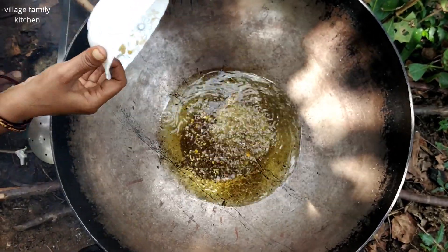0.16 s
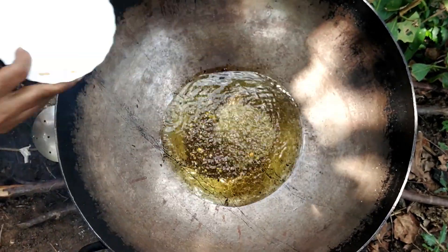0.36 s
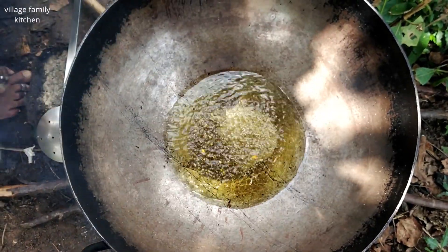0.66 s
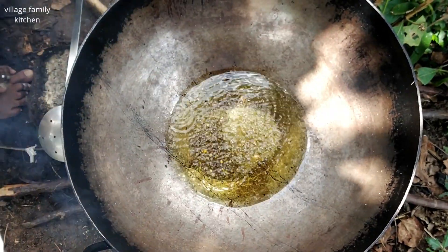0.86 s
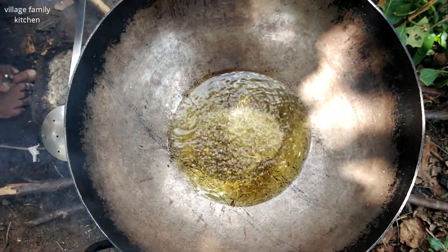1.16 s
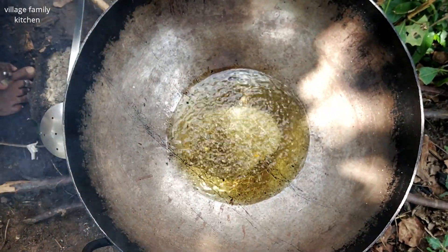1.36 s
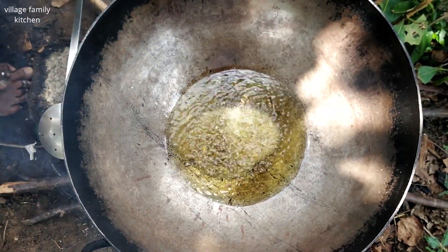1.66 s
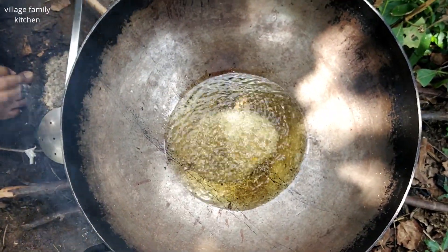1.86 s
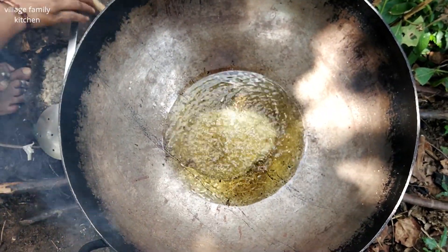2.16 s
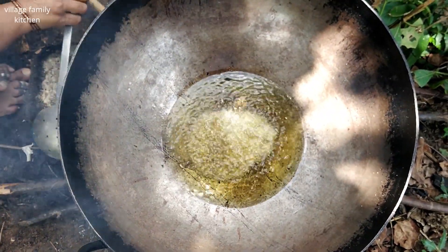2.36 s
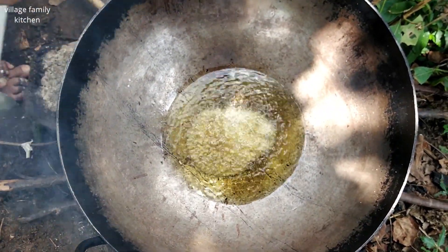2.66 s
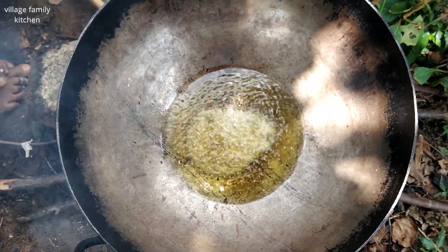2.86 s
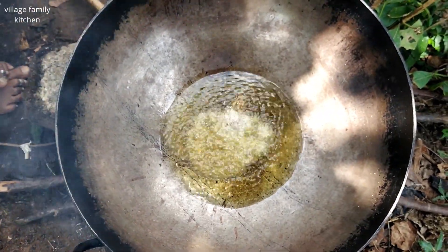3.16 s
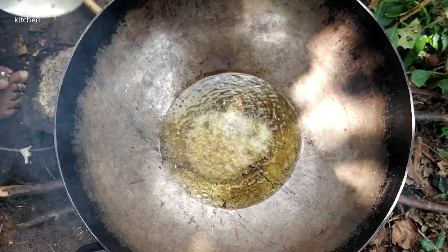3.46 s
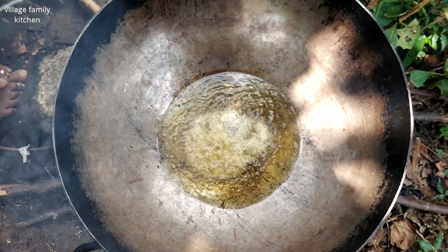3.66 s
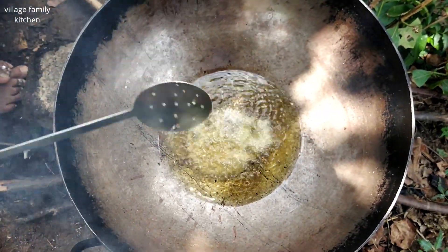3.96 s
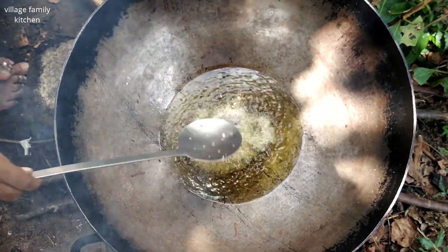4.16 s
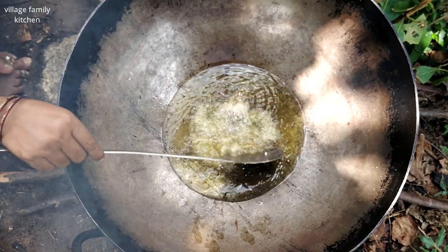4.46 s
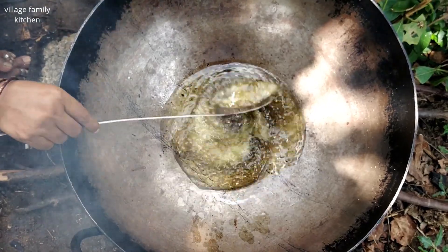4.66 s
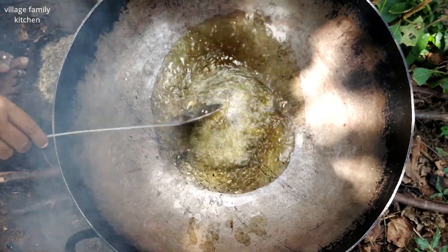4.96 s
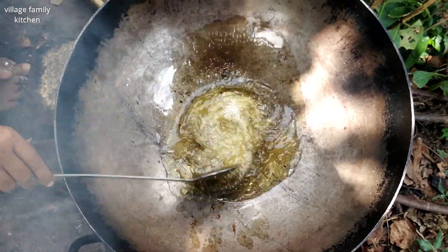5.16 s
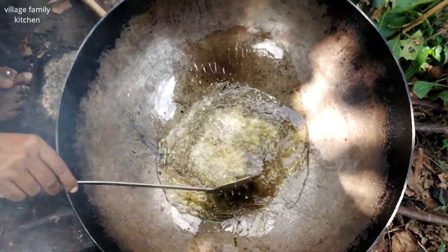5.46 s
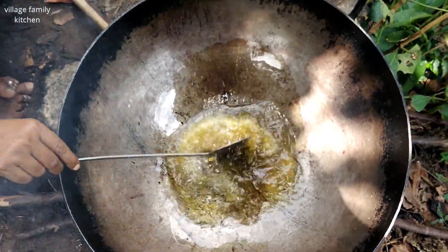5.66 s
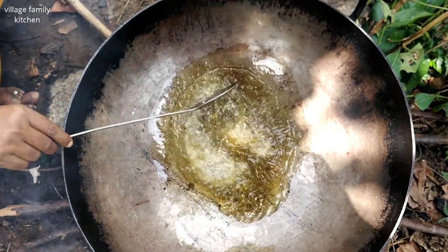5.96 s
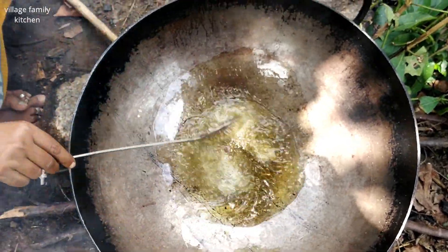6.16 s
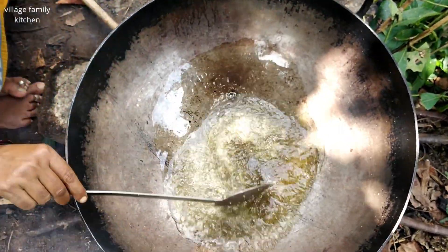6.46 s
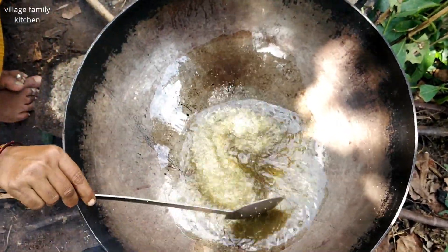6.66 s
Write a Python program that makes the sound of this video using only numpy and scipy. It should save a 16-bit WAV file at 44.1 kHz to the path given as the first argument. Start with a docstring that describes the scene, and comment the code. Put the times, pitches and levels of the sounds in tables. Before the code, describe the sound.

Heard close up outdoors, damp seeds in hot oil burst into dense hissing, spitting and very sharp snaps for about a second. The frying thins to a soft fizz with separate bubbly, ringing pops. A steel skimmer clinks as it is picked up, then knocks and scrapes the iron wok with short gritty strokes while crackling continues. A low wood fire murmurs underneath.

```python
"""Seeds fry in a pool of hot oil in an iron wok over a wood fire, outdoors and heard close up.
The oil is fizz made of countless tiny bursts, with showers of bright spitting that thin as the seeds dry.
Steam bubbles pop as short rising rings with noisy tails; seeds snap as millisecond noise bursts.
The fire murmurs as shaped noise and cracks; a steel skimmer clinks in its modes, then knocks and scrapes.
Something hoots faintly far away, and a limiter ducks on the sharpest peaks."""
import sys
import numpy as np
from scipy import signal
from scipy.fft import rfft, irfft, next_fast_len
from scipy.io import wavfile
from scipy.ndimage import uniform_filter1d, map_coordinates

SR = 44100
rng = np.random.default_rng(int(sys.argv[2]) if len(sys.argv) > 2 else 0)


def to_wav(sig):
    """Store sig (one row per channel, or 1-D mono) as 16-bit WAV at the path in sys.argv[1].

    Samples outside -1..1 are clipped; the rate is SR.
    """
    pcm = np.clip(np.atleast_2d(sig), -1, 1) * 32767
    pcm = np.round(pcm).astype(np.int16)
    wavfile.write(sys.argv[1], SR, pcm.T)  # frames by channels


N = 300321

# Ringing modes of the iron wok. Each row: pitch in Hz, width in Hz, relative level in dB.
WOK_MODES = [(211.4, 26, 3), (335, 50, 4.5), (520, 26, -3), (894, 67, -4.5), (1294, 66, 0),
             (1650, 100, 3.5), (1984, 120, 7.5), (2167, 170, 6.5), (2390, 78, 6.5), (2874, 195, 14.5),
             (2943, 146, 15), (3240, 9.3, 12.5), (3400, 59, 9), (3740, 60, 9.5), (4050, 62, -12),
             (4920, 69, 6), (5720, 68, 6), (6400, 11, 8.5), (7600, 110, -17)]


def amp(db):
    """Decibels to gain."""
    return 10 ** (np.asarray(db) / 20)


def unit(x):
    """Scale to rms 1."""
    return x / np.sqrt(np.mean(x ** 2) + 1e-20)


def along(points, hz):
    """Read a curve of (Hz, value) points on a log frequency axis."""
    f, value = np.transpose(points)
    return np.interp(np.log(hz + 1), np.log(f + 1), value)


def curve(rows):
    """Draw straight lines through (seconds, value) rows, one value per sample."""
    return np.interp(np.arange(N) / SR, *np.transpose(rows))


def wobble(rate):
    """A smooth random curve with rate knots a second."""
    knots = rng.standard_normal(int(N * rate / SR) + 4)
    return map_coordinates(knots, [np.arange(N) * rate / SR])


def chance_times(per_s):
    """Random moments in seconds, one in each slot of 1 / per_s seconds."""
    slots = np.arange(int(per_s * N / SR))
    return (slots + rng.random(len(slots))) / per_s


def add(out, s, x):
    """Mix x into out at s seconds."""
    i = max(round(s * SR), 0)
    out[:, i:i + x.shape[-1]] += x[..., :max(N - i, 0)]


def filtered(x, response):
    """Shape x by a response given as a function of frequency in Hz."""
    n = x.shape[-1]
    padded = next_fast_len(n + n // 10)
    spectrum = rfft(x, padded) * response(np.fft.rfftfreq(padded, 1 / SR))
    return irfft(spectrum, padded)[..., :n]


def resonance(f, hz, width):
    """A causal resonance of peak gain 1."""
    return 1j * f * width / (hz * hz - f * f + 1j * f * width)


def low_cut(x, hz):
    """A causal high-pass, 12 dB an octave."""
    return filtered(x, lambda f: 1j * f / hz * resonance(f, hz, hz))


def band_noise(hz, width, size):
    """A band of noise around one pitch, on two channels."""
    return unit(filtered(rng.standard_normal((2, size)), lambda f: resonance(f, hz, width) ** 2))


def spread(pair):
    """Two unrelated signals become left and right, more alike in the bass than in the treble."""
    # Stereo likeness. Each row: frequency in Hz, left-right correlation.
    likeness = [(50, 0.7), (200, 0.91), (1000, 0.57), (3000, 0.22), (8000, 0.067)]

    def mid_side_gains(f):
        turn = np.arccos(np.clip(along(likeness, f), -1, 1)) / 2
        return np.array([np.cos(turn), np.sin(turn)])

    mid, side = filtered(pair, mid_side_gains)
    return np.array([mid + side, mid - side])


def grains(rate, size_db):
    """Random impulses of either sign on two channels, rate a second, their sizes scattered."""
    size = amp(size_db * np.minimum(rng.exponential(size=(2, N)), 4))
    hits = rng.random((2, N)) < rate / SR
    return hits * size * rng.choice([-1, 1], (2, N))


def patchy(x, depth_db):
    """Each band swells and sinks on its own, over tens of milliseconds."""
    bins = signal.stft(x, nperseg=512)[2]
    field = rng.standard_normal(bins.shape[1:])
    field = uniform_filter1d(field, size=7, axis=0)  # across frequency
    field = uniform_filter1d(field, size=6, axis=1)  # across time
    return signal.istft(bins * amp(depth_db * unit(field)), nperseg=512)[1][:, :N]


def sizzle(fizz_db=-1.5, crackle_db=-7, bubble_db=-5):
    """Countless tiny bursts merge into fizz; fewer, larger ones crackle or ring briefly, each at its own pitch."""
    # Frying strength, fierce on the damp seeds and livelier again when stirred.
    # Each row: time in seconds, level in dB.
    frying = [(0, -26.5), (0.3, -23), (0.76, -31), (1.35, -37), (2.5, -34.5), (4.2, -34), (4.55, -31),
              (5.15, -34), (5.4, -32), (6.81, -34)]
    # Tone of the fizz. Each row: frequency in Hz, gain in dB.
    fizz_tone = [(300, -2), (900, -4.5), (2000, 1), (3100, 8), (4500, 4.5), (7000, 3.5), (8500, 1.5),
                 (10800, 3), (13000, -7), (16000, -12)]
    fizz = patchy(spread(grains(rate=14000, size_db=2)), depth_db=3.3)
    fizz = unit(filtered(fizz, lambda f: amp(along(fizz_tone, f))))
    fizz = fizz * amp(3.92 * wobble(31))
    t = np.arange(SR // 30) / SR
    crackle, bubbles = np.zeros((2, 2, N))
    # lowest pitch in Hz, highest over lowest, bandwidth over pitch, t60 in seconds
    for layer, lowest_hz, span, breadth, t60 in [(crackle, 4500, 2.6, .4, .008), (bubbles, 3000, 4, .13, .06)]:
        for when, pitch, size, pan in rng.random((260, 4)):
            hz = lowest_hz * span ** pitch
            burst = band_noise(hz, breadth * hz, size=len(t))
            burst = burst * amp(20 * size ** 2 - 60 * t / t60)
            add(layer, when * N / SR, burst * np.sqrt([[pan], [1 - pan]]))
    mix = amp(fizz_db) * fizz + amp(crackle_db) * unit(crackle) + amp(bubble_db) * unit(bubbles)
    return amp(curve(frying)) * mix


def spitting(centre_hz=10500, width_hz=8000, t60=0.011):
    """A dense shower of bright little snaps swells as the damp seeds heat and thins as they dry."""
    peak_s, peak_db = 0.36, -22.5  # hardest once the seeds have heated through
    heating_db_per_s, drying_db_per_s, dry_db = 27, 17.5, -45.5  # dry_db is what dry seeds keep up
    out, t = np.zeros((2, N)), np.arange(SR // 100) / SR
    for when, size, colour in rng.random((1500, 3)):
        hz = centre_hz * (0.33 + 0.79 * colour)
        burst = band_noise(hz, width_hz, size=len(t)) * amp(-60 * t / t60)
        add(out, when * N / SR, burst * amp(20 * size ** 2))
    since = np.arange(N) / SR - peak_s
    damp_db = peak_db + np.minimum(heating_db_per_s * since, -drying_db_per_s * since)
    return amp(np.maximum(damp_db, dry_db)) * unit(out)


def fire(roar_db=-44.5, crack_db=0, crack_hz=1500):
    """Flames murmur under the wok as low shaped noise, and the wood cracks in dull bursts now and then."""
    # Tone of the flames. Each row: frequency in Hz, gain in dB.
    flame_tone = [(15, -51), (25, -34), (53, -13), (112, -14.5), (173, -2), (205, 6.5), (255, 2),
                  (287, -2.5), (340, -1.5), (396, -7.5), (690, -9), (1050, -15.5), (1220, -22),
                  (1400, -22.5), (1820, -54), (3080, -120)]
    # Dull cracks of the firewood. Each row: start in seconds, peak level in dB.
    wood_cracks = [(0.2405, 1), (.558, -6), (1.3169, -14.5), (2.369, -8.5), (2.799, -7), (3.29, -11.5),
                   (3.947, -3.5), (3.992, -15), (5.001, -9), (5.028, -2.5), (5.121, -8), (6.291, -11.5)]
    roar = spread(rng.standard_normal((2, N)))
    roar = unit(filtered(roar, lambda f: amp(along(flame_tone, f))))
    out, t = roar * amp(roar_db + 0.6 * wobble(9.9)), np.arange(SR // 20) / SR

    def crack_tone(f):
        return resonance(f, crack_hz, 6500) * resonance(f, 800, 5300) * f / (f - 200j)

    for s, db in wood_cracks:
        decay = amp(-60 * t / 0.01) + amp(-4 - 60 * t / 0.025)
        burst = spread(filtered(rng.standard_normal((2, len(t))) * decay, crack_tone))
        add(out, s, amp(db + crack_db) * burst / np.abs(burst).max())
    return out


def pops(width_hz=430, ring_db=9, ring_t60=0.032, tail_db=2.0, tick_db=1, wet_db=1, rise=0.12,
         lag=0.00013, shared=0.078, spray_hz=3700, spray_width=2600):
    """A bubble rings, rising as it opens; the bowl draws out a beating tail, and oil sprays in spurts."""
    # The larger steam bubbles. Each row: start in seconds, pitch in Hz, relative level in dB,
    # spray and tick level in dB against the ring.
    big_bubbles = [(0.013, 4970, -13, 0.5), (0.119, 3450, -20.5, -2), (0.391, 3340, -6, -7.5),
                   (0.488, 3190, -15, 2), (0.557, 2010, -20.5, 0.5), (0.63, 3220, -24, 5),
                   (0.665, 4780, -14, -3), (0.71, 3180, -9.5, -9), (0.753, 3580, -7, -7),
                   (0.985, 1590, -6, -5), (1.009, 3070, -14.5, 3), (1.048, 4680, -23, 6),
                   (1.066, 4630, -21, 8), (1.205, 3500, -18.5, 2.5), (1.239, 3140, -17.5, -6.5),
                   (1.489, 2315, -16, 4), (1.634, 3390, -12.5, -9), (1.704, 7720, -27, -6),
                   (1.858, 2820, -19.5, -0.5), (1.974, 2844, -12.5, -4), (2.035, 5110, -4, -6.5),
                   (2.276, 2985, -10.5, -21), (2.493, 4830, -15.5, 2), (2.517, 3000, -8.5, -7.5),
                   (2.561, 3190, -10, -13), (2.595, 5730, -16.5, -14), (2.624, 7200, -16, -12),
                   (2.736, 2176, -12.5, -5.5), (2.775, 2050, -17, 0.5), (3.05, 3890, -12, -4),
                   (3.093, 2066, -9, 0), (3.216, 7880, -26.5, 2), (3.247, 3860, -24, 3),
                   (3.325, 1916, -10, 0), (3.344, 3370, -22.5, -16), (3.388, 3840, -16.5, -8),
                   (3.554, 3130, -20, -16), (3.704, 4010, -14.5, -6), (3.749, 2990, -15.5, -9.5),
                   (3.775, 5050, -22, -9), (3.887, 3010, -17, -10), (4.019, 2990, -24.5, -18),
                   (4.318, 2980, -18.5, 6.5), (4.39, 2670, -19.5, -3), (4.431, 3350, -17.5, -12),
                   (4.546, 2030, -14, 3.5), (4.826, 4980, -21.5, -3.5), (4.851, 4540, -23, 5.5),
                   (5.062, 3347, -10.5, -11.5), (5.96, 4400, -15, -3), (6.02, 4200, -23, 2),
                   (6.433, 6300, -27.5, 6), (6.497, 3080, -21, 7.5)]
    bowl_hz, bowl_width_hz = 3270, 920  # bubbles near this pitch couple to the bowl
    tail_t60, coupled_t60 = 0.05, 0.069  # seconds: any bubble's tail, and what full coupling adds
    left_db, coupled_left_db = 4, 5.5  # left over right, and what full coupling adds
    small_per_s, small_db, small_lowest_hz, small_octaves = 3, -30, 3020, 1.3  # small bubbles in between
    out, t = np.zeros((2, N)), np.arange(SR // 5) / SR
    small_bubbles = []
    for s in chance_times(small_per_s):
        hz = small_lowest_hz * 2 ** (small_octaves * rng.random() ** 2)
        small_bubbles.append((s, hz, small_db + rng.normal(0, 1.1), 0))
    for s, hz, db, spray_db in big_bubbles + small_bubbles:
        coupling = abs(resonance(hz, bowl_hz, bowl_width_hz)) ** 2
        fade = amp(-60 * t / (tail_t60 + coupled_t60 * coupling))
        pan_db = left_db + coupled_left_db * coupling
        noise = rng.standard_normal((3, 2, len(t)))
        # the ring starts up to lag seconds later on the left, differently for each bubble
        late = np.maximum(t - np.array([[lag * rng.random()], [0]]), 0)
        pitch = hz * (1 - rise * np.exp(-t / 0.0022))
        ring = amp(ring_db - 60 * late / ring_t60) * np.sin(2 * np.pi * pitch * late)
        ring = ring * (1 - np.exp(-late / .0002))
        tail = band_noise(hz, width_hz, size=len(t)) * fade * (1 - np.exp(-t / .003))
        tail = tail + shared * tail[::-1]  # part of the tail reaches both channels
        tail *= np.linalg.norm(fade) / np.linalg.norm(tail, axis=1, keepdims=True)
        spurts = amp(4.6 * unit(uniform_filter1d(noise[0, 0], size=150)))
        spray = filtered(noise[1], lambda f: resonance(f, spray_hz, spray_width) ** 2 + 0.062)
        spray = unit(spray) * unit(spurts) * fade
        tick = amp(tick_db - 60 * t / 0.0029) * noise[2]
        sides = unit(amp([[pan_db / 2], [-pan_db / 2]]))
        pop = ring + amp(tail_db) * tail + amp(spray_db) * (amp(wet_db) * spray + tick)
        add(out, s, amp(db) * sides * pop)
    return out


def snaps(t60=0.0051, echo_db=-19, echo_t60=0.017, breadth=1.0):
    """Each seed coat splits in a sharp noise burst that the bowl throws back; small ones go off at random."""
    # The loudest seed coats snapping. Each row: start in seconds, level in dB over the first millisecond.
    loud_snaps = [(0.018, -4), (0.0257, -9), (0.046, -2), (0.156, 1.5), (0.1997, -0.5), (0.2565, -1.5),
                  (0.271, -3), (0.2983, 0), (0.35, -6), (0.378, -8), (0.4472, -1.5), (0.4987, -1),
                  (0.5651, -1), (0.631, -9), (0.656, -4), (0.6968, 5), (0.7532, -8), (0.824, -2),
                  (0.8762, 7), (0.9687, -9.5), (1.0128, -2.5), (1.1435, -9.5), (1.2496, -12.5),
                  (1.454, -12.5), (1.496, -11.5), (2.0596, -13), (2.6031, -18), (2.6238, -13),
                  (2.7613, -16), (2.817, -14.5), (3.0049, 3.5), (3.1438, -14.5), (3.717, -14.5),
                  (4.2348, -11), (5.0946, -1), (5.1225, 0.5), (5.1538, -6.5), (5.3054, -12.5), (5.343, -15),
                  (5.8038, -18), (5.8494, -16.5), (5.887, -16.5), (5.9762, -13), (6.2416, -13),
                  (6.4072, -11.5), (6.6473, -14), (6.6664, -2.5)]
    centre_hz, scatter_octaves = 8500, 0.4  # how seeds differ
    small_per_s, small_db = 8.3, -21.5  # faint snaps in between
    out, t = np.zeros((2, N)), np.arange(SR // 20) / SR
    small_snaps = [(s, small_db + rng.normal(0, 2.4)) for s in chance_times(small_per_s)]
    decay = amp(-60 * t / t60) + amp(echo_db - 60 * t / echo_t60)
    for s, db in loud_snaps + small_snaps:
        hz = centre_hz * 2 ** rng.normal(0, scatter_octaves)
        burst = rng.standard_normal((2, len(t))) * decay
        burst = filtered(burst, lambda f: resonance(f, hz, breadth * hz))
        onset_rms = np.sqrt(np.mean(burst[:, t < .001] ** 2))
        add(out, s, amp(db) * burst / onset_rms)
    return out


def iron_ring(x, t60=0.4, wash=1.1, wash_t60=0.33):
    """The wok rings on in its upper modes after each burst, the lower ones longer; t60 holds at 2 kHz."""
    t = np.arange(SR // 2) / SR
    modes = np.zeros((2, len(t)))
    for hz, width, db in WOK_MODES:
        if hz > 1500:
            fade = amp(db - 60 * t / (t60 * 2000 / hz))
            modes += fade * np.sin(2 * np.pi * (hz * t + rng.random((2, 1))))
    noise = rng.standard_normal(modes.shape) * amp(-60 * t / wash_t60)
    tail = unit(modes) + wash * unit(noise)
    return signal.fftconvolve(x, tail / np.linalg.norm(tail[0]), axes=1)[:, :N]


def hoots(pitch_hz=339, overtone_db=-15):
    """Faint, level hoots from far off: a steady tone and a weaker overtone two octaves up."""
    # Each row: start in seconds, length in seconds, level in dB.
    far_hoots = [(0.207, 0.24, -39.5), (6.444, 0.12, -37.5), (6.633, 0.12, -37)]
    out, t = np.zeros((2, N)), np.arange(SR // 2) / SR
    phase = 2 * np.pi * pitch_hz * t
    tone = np.sin(phase) + amp(overtone_db) * np.sin(4 * phase)
    for s, length, db in far_hoots:
        gate = np.clip(np.minimum(t, length - t) / 0.013, 0, 1)
        add(out, s, amp(db) * gate * tone)
    return out


def clinks(clatter_db=-6, clatter_t60=0.11, overtone_db=-9, ring_db=1):
    """The steel skimmer rattles and rings in its modes, unsteady in the hand; its holes add many weak modes."""
    # Clinks as it is picked up. Each row: start in seconds, relative level in dB, ring t60 in seconds.
    pick_ups = [(2.3252, -21, 0.19), (2.389, -16.5, 0.14), (3.497, -11, 0.23), (3.909, -10.5, 0.17)]
    # Modes of the skimmer. Each row: pitch in Hz, relative level in dB.
    steel_modes = [(1500, -14), (2789, 2.5), (3214, 2), (4215, -4), (4963, 3), (5593, 4), (5857, -7),
                   (6400, -9), (6525, -14), (6853, 5.5), (7214, 2), (7450, -10), (7698, 4), (8699, -8.5),
                   (9453, -10), (10140, 3), (11040, -0.5), (12230, -24), (13620, -30), (14230, -11)]
    out, t = np.zeros((2, N)), np.arange(SR // 3) / SR
    weak_modes = np.column_stack([2900 * 5 ** rng.random(36), np.full(36, overtone_db)])
    hz, mode_db = np.vstack([steel_modes, weak_modes]).T[:, :, None]
    for s, db, t60 in pick_ups:
        waver = .05 * np.cumsum(rng.standard_normal((len(hz), len(t))), axis=1)  # phase drift in radians
        modes = amp(mode_db) * np.sin(2 * np.pi * hz * t + waver)
        # each mode reaches each channel with its own gain and sign
        reach = amp(2 * rng.standard_normal((2, len(hz)))) * rng.choice([-1, 1], (2, len(hz)))
        ring = amp(ring_db - 60 * t / t60) * unit(reach @ modes)
        clatter = unit(filtered(rng.standard_normal((2, len(t))), lambda f: resonance(f, 3100, 5000)))
        clatter = amp(clatter_db - 60 * t / clatter_t60) * clatter
        add(out, s, amp(db) * (1 - np.exp(-t / 0.00083)) * (ring + clatter))
    return out


def wok(f):
    """The iron bowl's response: its modes summed with alternating signs."""
    return sum((-1) ** k * amp(db) * resonance(f, hz, width) for k, (hz, width, db) in enumerate(WOK_MODES))


def stirring(iron_db=0, grit_db=-2, knock_db=0, knock_t60=0.078):
    """The skimmer's edge catches and slips over the iron with a gliding ring; bumps wake the wok's low modes."""
    # Strokes over the iron. Each row: start in seconds, length in seconds, relative level in dB,
    # ringing pitch in Hz at the start.
    strokes = [(4.231, 0.053, -30, 814), (4.458, 0.082, -15.5, 880), (4.504, 0.02, -19, 1500),
               (4.552, 0.093, -21.5, 1302), (4.668, 0.051, -19.5, 930), (4.881, 0.014, -17.5, 1233),
               (4.896, 0.084, -24.5, 3000), (5.259, 0.0094, -19, 2050), (5.265, 0.072, -26, 2920),
               (5.354, 0.086, -23.5, 2070), (5.442, 0.061, -21.5, 2330), (5.577, 0.0156, -22, 2610),
               (5.623, 0.051, -24, 2080), (5.997, 0.058, -22.5, 1910), (6.112, 0.028, -32.5, 1303)]
    # Bumps against the wok. Each row: start in seconds, level in dB over the first 20 ms, pitch in Hz.
    knocks = [(2.329, -35.5, 290), (2.368, -36.5, 295), (4.261, -28, 225), (4.459, -21.5, 240),
              (4.621, -29, 273), (4.673, -31.5, 243), (4.884, -27, 247), (5.26, -28, 263),
              (5.369, -39, 276), (5.58, -31.5, 234), (5.583, -30, 480), (6, -25, 253), (6.113, -29.5, 460)]
    # Tone of the gritty slipping. Each row: frequency in Hz, gain in dB.
    grit_tone = [(100, -22), (220, -3.5), (600, -12), (1500, -8.5), (3000, 10.5), (5000, 3), (8000, 1),
                 (15000, -9)]
    fade_db, glide = 2.5, 1.15  # over a stroke the push eases and the ring rises by this ratio
    force, blade, bumps = np.zeros((3, 2, N))
    t = np.arange(SR // 3) / SR
    for s, length, db, ring_hz in strokes:
        bite_db = 5 * np.exp(-t / 0.0059)  # the edge bites hardest as it lands
        ease_db = fade_db * np.minimum(t / length, 1)
        release_db = 60 * np.maximum(t - length, 0) / 0.067
        push = amp(db + bite_db - ease_db - release_db)
        # the ring glides as the contact moves
        phase = 2 * np.pi * np.cumsum(np.interp(t, [0, length], [ring_hz, glide * ring_hz])) / SR
        # slow noise on both phases blurs the ring into a narrow band
        a, b = unit(uniform_filter1d(rng.standard_normal((2, len(t))), size=200))
        add(force, s, push)
        add(blade, s, amp(-12) * push * (a * np.cos(phase) + b * np.sin(phase)))
    slips = patchy(spread(grains(rate=2500, size_db=4)), depth_db=3.5)
    slips = unit(slips * amp(3.2 * wobble(200)))
    iron = filtered(slips * force, wok) / np.std(filtered(slips, wok))
    grit = force * unit(filtered(slips, lambda f: amp(along(grit_tone, f))))
    for s, db, hz in knocks:
        blow = rng.standard_normal(len(t)) * amp(-60 * t / knock_t60)
        blow[0] += 14  # the first contact, before the blade chatters
        thud = filtered(blow, lambda f: resonance(f, hz, 0.16 * hz) * resonance(f, 1.53 * hz, 1.15 * hz))
        onset_rms = np.sqrt(np.mean(thud[t < .02] ** 2))
        add(bumps, s, amp(db + knock_db) * thud / onset_rms)
    return amp(iron_db) * iron + amp(grit_db) * grit + blade + bumps


def scene(low_hz=260, stir_low_hz=40):
    """Oil, skimmer and fire around one wok; bursts so small radiate little bass, so the oil is low-cut."""
    bursts = pops() + snaps()
    oil = bursts + amp(-19.5) * iron_ring(bursts) + sizzle() + spitting()
    return low_cut(oil, low_hz) + clinks() + low_cut(stirring(), stir_low_hz) + fire() + hoots()


def record(dry, release_db=120, top_hz=16000):
    """A limiter ducks peaks over +2 dB and recovers at release_db a second; the rest clips, treble is cut."""
    over_db = np.maximum(20 * np.log10(np.abs(dry).max(0) + 1e-6) - 2, 0)
    ramp = release_db * np.arange(N) / SR
    duck_db = np.maximum.accumulate(over_db + ramp) - ramp  # jumps up at once, falls along the ramp
    duck_db = uniform_filter1d(duck_db, size=15)
    clipped = np.clip(dry * amp(-duck_db), -1, 1)
    return filtered(clipped, lambda f: 1 / (1 + (f / top_hz) ** 120))


dry = scene()
out = record(dry)
to_wav(out)
```